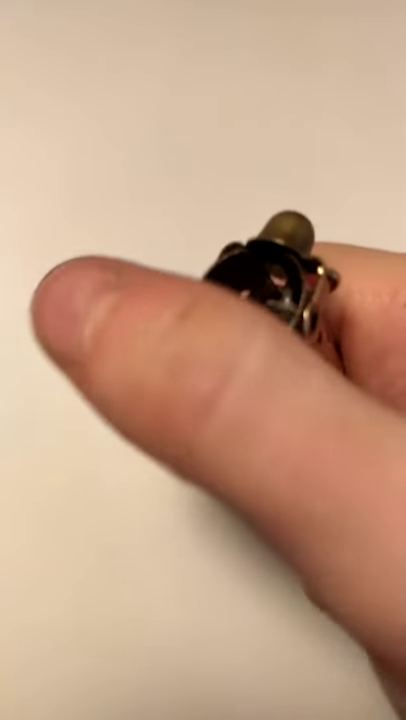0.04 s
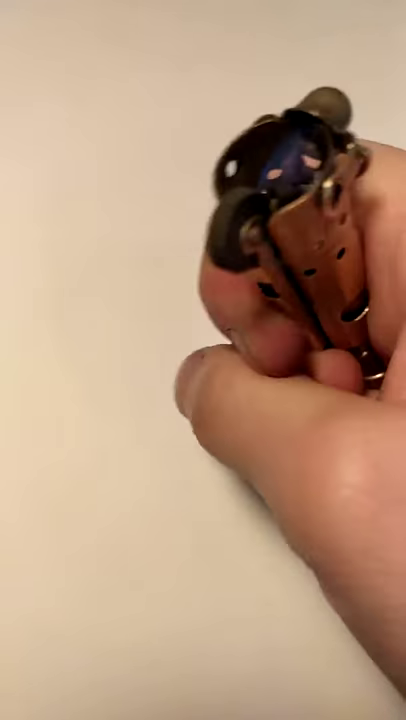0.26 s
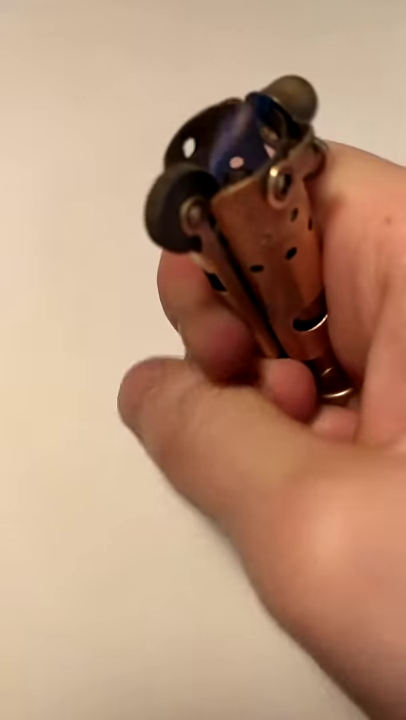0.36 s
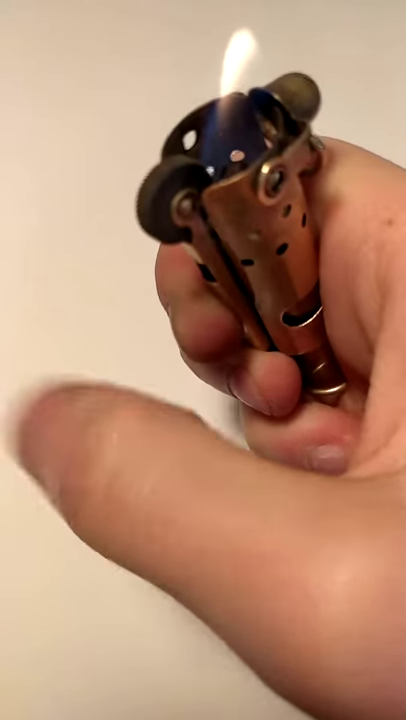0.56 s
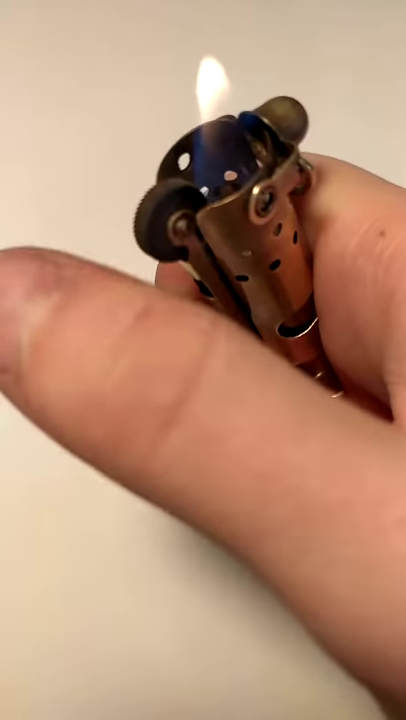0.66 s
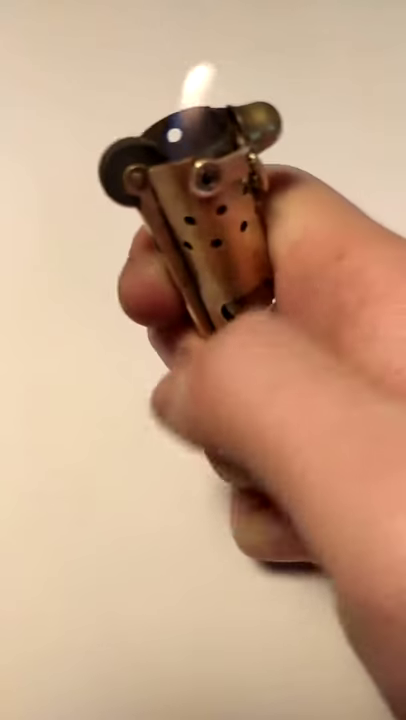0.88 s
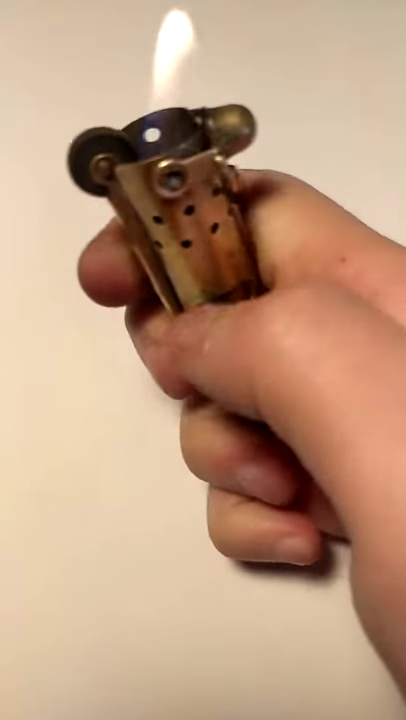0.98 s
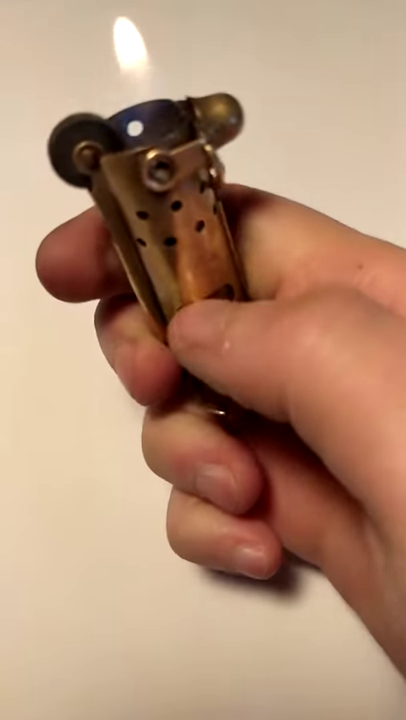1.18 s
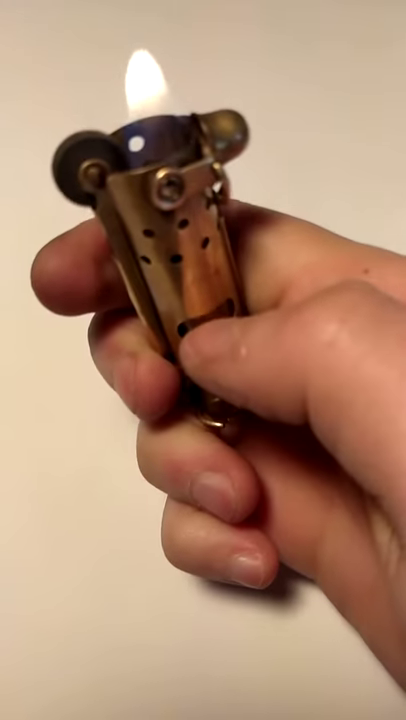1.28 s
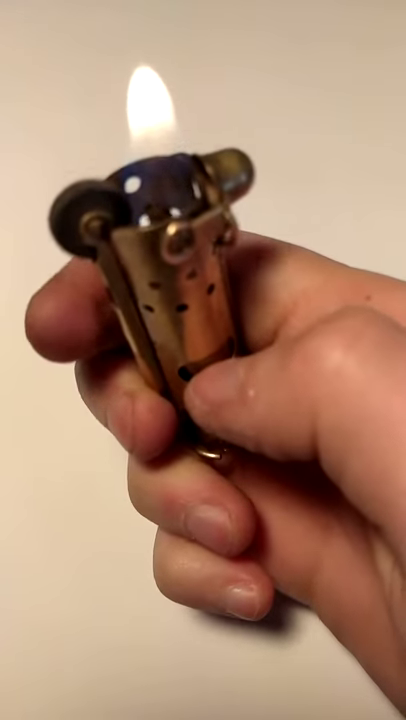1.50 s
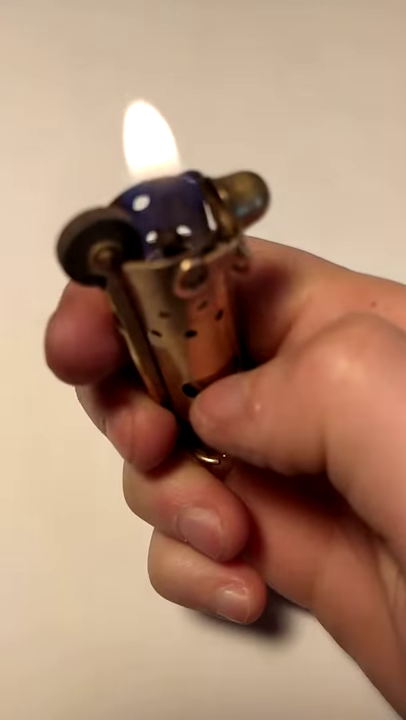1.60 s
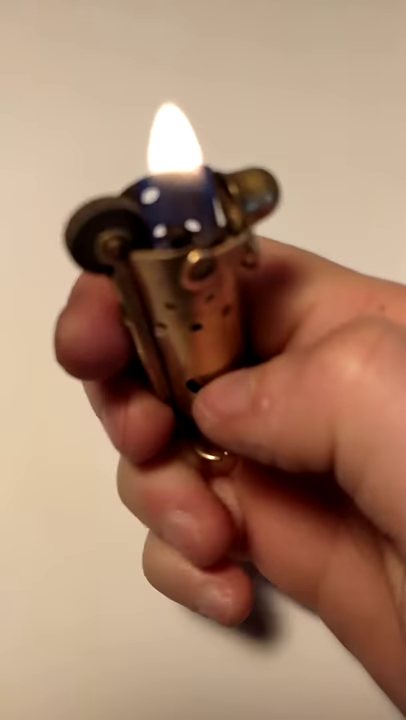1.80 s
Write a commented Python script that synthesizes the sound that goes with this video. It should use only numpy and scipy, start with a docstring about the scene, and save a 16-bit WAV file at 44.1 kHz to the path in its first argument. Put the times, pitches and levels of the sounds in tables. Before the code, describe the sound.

A brass lighter's flint wheel is struck close to the microphone: a faint thumb slide and soft tap, then at 0.23 seconds a very short, bright gritty rasp with hollow clack and low thud. Loose parts rattle and ring until about 0.3. Dull taps follow at 0.4 and 0.47, a nail tick at 0.83, then a tiny scrape and metallic ticks from 1.0 to 1.12, over quiet room hiss and low murmur.

```python
"""In a small quiet room, a thumb spins the flint wheel of a brass lighter close to the microphone.
The wheel bites, rasps and lets go: streams of chips and grit excite damped resonances of wheel and frame.
The hand thuds as decaying sines, the case rings in its modes, and loose parts rattle as short noise bursts.
Then the fingers shift their grip with small ticks and a scrape, over hiss, a faint whine and a low murmur."""
import sys
import numpy as np
from scipy import signal
from scipy.fft import rfft, irfft, next_fast_len
from scipy.io import wavfile
from scipy.ndimage import map_coordinates

SR = 44100
rng = np.random.default_rng(int(sys.argv[2]) if len(sys.argv) > 2 else 0)


def dump(signal):
    """Clip the signal to [-1, 1] and save it as 16-bit WAV at the path in sys.argv[1]."""
    limited = np.clip(np.atleast_2d(signal).T, -1, 1)
    pcm = np.round(limited * 32767).astype(np.int16)
    wavfile.write(sys.argv[1], SR, pcm)


N = 81585
T = np.arange(N) / SR  # time in seconds


def amp(db):
    """Decibels to amplitude: 20 dB is a factor of ten."""
    return 10 ** (np.asarray(db) / 20)


def unit(x):
    """Normalisation of the mean power: x scaled to rms 1."""
    return x / np.sqrt(np.mean(x ** 2) + 1e-20)


def along(points, hz):
    """Interpolation of (Hz, value) points on a logarithmic frequency axis."""
    f, value = np.transpose(points)
    return np.interp(np.log(hz + 1), np.log(f + 1), value)


def level(rows, outside=-120):
    """Envelope through (s, dB) points, linear in decibels; outside=None holds the end values."""
    s, db = np.transpose(rows)
    return amp(np.interp(T, s, db, outside, outside))


def pan(db):
    """Stereo placement by level difference: left minus right in dB."""
    return amp(np.array([[.5], [-.5]]) * db)


def filtered(x, response):
    """Linear filtering: the spectrum of x times a response of frequency."""
    size = next_fast_len(N + SR // 2)
    hz = np.fft.rfftfreq(size, 1 / SR)
    return irfft(rfft(x, size) * response(hz), size)[..., :N]


def coloured(x, colour):
    """Spectral shaping by (Hz, dB) points, at rms 1."""
    return unit(filtered(x, lambda hz: amp(along(colour, hz))))


def noise(colour):
    """Coloured noise, incoherent between the two channels."""
    return coloured(rng.standard_normal((2, N)), colour)


def diffuse(colour):
    """Diffuse field: noise from all around is coherent between the channels only at low frequencies."""
    # Likeness of left and right. Each row: frequency in Hz, correlation from 0 to 1.
    alike = [(30, .6), (150, .5), (350, .45), (900, 0), (15000, 0.0033)]

    def mid_and_side_gains(hz):
        angle = np.arccos(np.clip(along(alike, hz), -1, 1)) / 2
        return np.array([np.cos(angle), np.sin(angle)])

    mid, side = filtered(noise(colour), mid_and_side_gains)
    return unit(np.array([mid + side, mid - side]))


def blow(start, t60, attack=.0003):
    """Contact envelope: a quick rise, then exponential decay by 60 dB per t60 (all in seconds)."""
    t = np.maximum(T - start, 0)
    return (1 - np.exp(-t / attack)) * 1000 ** (-t / t60)


def clicks(rows, colour):
    """Impacts as short decaying noise bursts of one colour, from (s, dB, t60 s, pan dB) rows."""
    envelope = sum(amp(db) * pan(side) * blow(s, t60) for s, db, t60, side in rows)
    return noise(colour) * envelope


def room(x):
    """Reverberation: convolution with a noise tail whose decay time depends on frequency."""
    # Decay of the room. Each row: frequency in Hz, t60 in seconds.
    decay = [(100, .25), (500, .25), (2500, .33), (6000, .27), (10000, .22), (15000, .15)]
    hz, t, cells = signal.stft(rng.standard_normal((2, SR // 2)), SR, nperseg=256)
    fading = amp(-60 * t / along(decay, hz)[:, None])
    tail = signal.istft(cells * fading, SR, nperseg=256)[1]
    tail = tail * (1 - np.exp(-T[:tail.shape[1]] / .001))  # soft onset of the tail
    return signal.fftconvolve(x, tail / np.linalg.norm(tail[0]), axes=1)[:, :N]


def hiss():
    """Broadband room noise as a steady diffuse field."""
    # Spectrum of the hiss. Each row: frequency in Hz, relative level in dB.
    colour = [(12, -36), (20, -7), (37, -5.5), (70, -9.5), (116, -5), (203, -9), (261, -2.5), (375, -7.5),
              (539, -8.5), (754, -10.5), (819, -13), (891, -11), (1390, -13.5), (2060, -14), (2570, -16.5),
              (4890, -18.5), (15800, -29.5)]
    return amp(-68) * diffuse(colour) * pan(-2)


def whine():
    """Pure tone: a faint steady sine, equal in both channels."""
    return amp(-88) * np.sin(2 * np.pi * 2067 * T)


def murmur():
    """Air noise in a narrow low band, slowly modulated in level."""
    # Swell of the murmur. Each row: time in seconds, level in dB before the lift below.
    swell = [(0, -73), (.25, -78), (.55, -81), (.8, -73.5), (1.1, -72.5), (1.38, -67), (1.47, -79.5),
             (1.85, -79)]
    # Spectrum of the murmur. Each row: frequency in Hz, relative level in dB.
    colour = [(150, -48), (240, -11.5), (275, 1.5), (350, 2.5), (420, 0), (520, -10), (900, -31)]
    lift_db = 1.5
    return amp(lift_db) * level(swell, None) * diffuse(colour) * pan(-6.5)


def background():
    """Superposition of the steady hiss, the whine and the murmur of air."""
    return hiss() + murmur() + whine()


def slide():
    """Sliding friction: noise of the thumb on the wheel, fading out before the main stroke."""
    # Spectrum of the friction. Each row: frequency in Hz, relative level in dB.
    colour = [(300, 1.5), (900, 2.5), (1900, 8), (3000, -0.5), (4500, 7), (6800, -10), (9500, 0),
              (12000, -15), (15500, -28)]
    end_s, fade_s = .225, .025
    fade = np.clip((end_s - T) / fade_s, 0, 1)
    return amp(-65.5) * fade * noise(colour) * pan(-2.5)


def taps():
    """Soft impacts: dull taps of the fingers."""
    # The taps. Each row: start in seconds, level in dB, t60 in seconds, pan in dB.
    touches = [(.166, -53.5, .02, -3), (.3948, -55.5, 0.034, 2.5), (.4712, -54.5, .018, 5.5)]
    # Spectrum of the taps. Each row: frequency in Hz, relative level in dB.
    colour = [(200, 0), (800, -5.5), (2200, 3), (5000, -2.5), (9000, -2.5), (15000, -22)]
    return clicks(touches, colour)


def wheel(grit):
    """Stick of uneven teeth on flint: each tooth chips off a tiny noise burst, in a stream of grit."""
    teeth_per_s, jitter_teeth, scatter_db = 1700, .25, 4
    chip_s = .00038  # time constant of one chip's decay
    count = 6000
    draws = rng.standard_normal((count, 2))
    times = (np.arange(count) + jitter_teeth * draws[:, 0]) / teeth_per_s
    strengths = amp(scatter_db * draws[:, 1])
    teeth = np.bincount(np.abs(times * SR).astype(int), strengths, N)[:N]
    chips = unit(signal.lfilter([1], [1, -np.exp(-1 / (chip_s * SR))], teeth))
    return (chips + grit) * rng.choice([-1, 1], (2, N))  # random signs turn the envelope into noise


def bite():
    """Slow friction at first contact: the wheel grips the flint."""
    # Course of the bite. Each row: time in seconds, level in dB before the lift below.
    course = [(.217, -75), (.2205, -52), (.224, -43), (.229, -46), (.235, -41), (.239, -60)]
    # Spectrum of the bite. Each row: frequency in Hz, relative level in dB.
    colour = [(500, -9), (2500, -8.5), (4200, -2.5), (5200, 7.5), (6300, -7), (7400, -5), (9500, -4.5),
              (11500, -10), (15500, -37)]
    lift_db = 2
    return amp(lift_db) * coloured(wheel(grit=.96), colour) * level(course)


def frame(hz):
    """Resonance: the response of wheel and frame peaks at damped modes over a broad band."""
    # Modes. Each row: frequency in Hz, width between -6 dB points in Hz, relative level in dB.
    modes = [(1670, 300, -6), (2814, 1000, -1.5), (4190, 330, 1.5), (4850, 900, -2), (5484, 306, 1),
             (6600, 170, -6), (8446, 730, 6.5), (9386, 440, 4), (10300, 130, 0), (11043, 410, 3),
             (12350, 400, -12), (15330, 500, -5.5)]
    # Broad part of the rasp. Each row: frequency in Hz, relative level in dB before its power is halved.
    broad = [(300, -37.5), (600, -6), (1700, -10), (3000, -8), (5500, -6), (7300, -6), (10000, -2.5),
             (12500, -5.5), (15500, -10.5)]
    peaks = sum(amp(db) ** 2 / (1 + ((hz - f) / (width / 2)) ** 2) ** 2 for f, width, db in modes)
    power = amp(-1) ** 2 * peaks + amp(along(broad, hz)) ** 2 / 2
    return np.sqrt(power)


def rasp():
    """Forced vibration: chips and grit of the spinning wheel drive the resonant frame."""
    # Course of the rasp. Each row: time in seconds, level in dB before the stereo balance.
    course = [(.229, -70), (.2335, -45), (.2361, -38), (.2376, -25), (.2401, -18.5), (.2416, -26),
              (.2462, -29), (.250, -36), (.254, -52), (.258, -70)]
    # Stereo balance. Each row: frequency in Hz, left minus right in dB.
    balance = [(300, 3), (1200, 4), (2500, 4), (5000, 4.5), (7500, 4), (10500, -1.5), (14000, 6)]
    driven = unit(filtered(wheel(grit=1), frame)) * level(course)
    return filtered(driven, lambda hz: pan(along(balance, hz)))


def shudder():
    """Damped random vibration: the hand shudders with the stroke."""
    # Spectrum of the shudder. Each row: frequency in Hz, relative level in dB.
    colour = [(25, -21), (60, -4), (120, 4), (200, -11.5), (320, -6.5), (450, -5.5), (800, -36.5),
              (2000, -53.5)]
    return amp(-46) * blow(.23, t60=.22, attack=.0012) * diffuse(colour)


def knocks():
    """Heavily damped oscillators: thumb and hand knock on the lighter, without deep bass."""
    # The knocks. Each row: start in seconds, level in dB before the low cut, pitch in Hz,
    # t60 in seconds, pan in dB.
    rows = [(0.2355, -31, 363, 0.023, 2.5), (.2392, -27, 104, 0.053, 3.5), (.2445, -29.5, 290, 0.027, -1.5),
            (.2655, -43, 250.5, .035, -9.5), (0.2755, -43.5, 110.3, .045, -2.5),
            (.3090, -54, 140, 0.039, 2), (.471, -64, 150, .06, 1)]
    low_cut_hz, lag_s = 46.3, .00065
    thuds = 0
    for s, db, hz, t60, side in rows:
        sine = np.sin(2 * np.pi * hz * (T - s))
        thuds = thuds + amp(db) * pan(side) * blow(s, t60, attack=.0012) * sine
    delays = np.array([[.5], [-.5]]) * lag_s  # the left channel comes later by lag_s

    def delayed_low_cut(hz):
        return np.exp(-2j * np.pi * hz * delays) * hz ** 4 / (hz ** 4 + low_cut_hz ** 4)

    return filtered(thuds, delayed_low_cut)


def clack():
    """Sudden impact: a hollow narrow-band burst as the thumb snaps against the lighter."""
    # The clack. Each row: start in seconds, level in dB, t60 in seconds, pan in dB.
    release = [(.2365, -25.5, 0.012, 7)]
    # Spectrum of the clack. Each row: frequency in Hz, relative level in dB.
    colour = [(400, -22), (800, -9), (1200, 14.5), (1600, -10), (2100, -20), (5000, -25)]
    return clicks(release, colour)


def rattle():
    """Repeated impacts: the loose parts strike one another after the stroke."""
    # The impacts. Each row: start in seconds, level in dB, pan in dB.
    impacts = [(0.2441, -29, 14.5), (0.2656, -35, 4), (0.2721, -44, 10), (0.2763, -38.5, 8),
               (0.2948, -42.5, 6)]
    # Spectrum of the loose parts. Each row: frequency in Hz, relative level in dB.
    colour = [(290, -34), (500, -6.5), (771, -10.5), (878, -13.5), (2450, -8), (2750, -16), (3570, -5.5),
              (4560, -3), (5660, -6.5), (11000, -3), (15800, -18.5)]
    t60_s = .015
    return clicks([(s, db, t60_s, side) for s, db, side in impacts], colour)


def case(x):
    """Modal ringing: the brass case answers whatever shakes it with decaying sines."""
    # Modes of the case. Each row: frequency in Hz, relative level in dB, t60 in seconds.
    modes = [(2751, -14, .3), (3240, -12, .25), (4125, -5, .18), (4430, -5, .22), (4890, -8, .18),
             (5669, -12, .35), (6627, -5, .25), (7058, -4, .17), (7407, -4, .18), (8188, -6, .2),
             (8762, -11, .18), (9338, -11, .2), (9875, -8, .16), (11080, -4, .14), (11636, -3, .15)]
    t = T[:SR // 2]
    phases = rng.uniform(0, 2 * np.pi, (len(modes), 2, 1))
    ring = 0
    for (hz, db, t60), phase in zip(modes, phases):
        ring = ring + amp(db - 60 * t / t60) * np.sin(2 * np.pi * hz * t + phase)
    return signal.fftconvolve(x, ring / np.linalg.norm(ring[0]), axes=1)[:, :N]


def strike():
    """Excitation and response: the metal sounds shake the case, and metal and thuds excite the room."""
    metal = bite() + rasp() + rattle()
    to_tails = metal * pan(-7)  # ring and room lean to the right
    metal_tails = amp(-18) * case(to_tails) + amp(-16) * room(to_tails)
    thud = knocks() + shudder() + clack()
    return metal + metal_tails + thud + amp(-22) * room(thud)


def nail():
    """Hard light impacts: crisp ticks of a fingernail."""
    # The nail ticks. Each row: start in seconds, level in dB, t60 in seconds, pan in dB.
    touches = [(.8308, -50.5, .011, 0), (1.0345, -59, 0.013, 3.5), (1.1158, -53, 0.016, -3)]
    # Spectrum of the nail. Each row: frequency in Hz, relative level in dB.
    colour = [(800, -14), (2500, 3), (5000, 3), (10000, 3.5), (15500, -18)]
    return clicks(touches, colour)


def scrape():
    """Rough friction: the lighter slips through the fingers, its noise modulated in random grains."""
    # Course of the scrape. Each row: time in seconds, level in dB before the pan.
    course = [(1.002, -62), (1.007, -60.5), (1.022, -63.5), (1.035, -59), (1.042, -67), (1.051, -65),
              (1.064, -82)]
    # Spectrum of the scrape. Each row: frequency in Hz, relative level in dB.
    colour = [(800, -16), (2400, -11), (3300, 0.5), (4200, -10), (5100, 4.5), (6300, -12.5), (8500, -1),
              (11000, -8), (15500, -15.5)]
    grains_per_s, grain_db = 700, 4
    grains = map_coordinates(rng.standard_normal(N), [T * grains_per_s])  # smooth random curve
    rough = amp(grain_db * grains) * rng.standard_normal((2, N))
    return coloured(rough, colour) * level(course) * pan(-.82)


def ticks():
    """Small metal impacts as the grip shifts."""
    # The ticks. Each row: start in seconds, level in dB, t60 in seconds, pan in dB.
    touches = [(1.0130, -45, 0.0094, -2), (1.0278, -66, .01, -9), (1.0505, -59, .012, 0),
               (1.0900, -41.5, 0.021, 0), (1.1160, -52, 0.01, -8), (1.1200, -60, .009, -2)]
    # Spectrum of the ticks. Each row: frequency in Hz, relative level in dB.
    colour = [(800, -19), (2000, -7), (3200, -8), (4900, 6), (6000, -2), (7200, 7.5), (9000, -1.5),
              (12000, -12), (15500, -26)]
    return clicks(touches, colour)


def handling():
    """Contact sounds of the fingers with their reverberation, and the dry slide of the thumb."""
    touches = taps() + nail() + scrape() + ticks()
    return slide() + touches + amp(-13) * room(touches)


def scene():
    """Superposition of the room, the handling and the strike."""
    return background() + handling() + strike()


def record(dry):
    """Band limitation: an ideal low-pass filter keeps only what lies below 15830 Hz."""
    return filtered(dry, lambda hz: hz < 15830)


dry = scene()
out = record(dry)
dump(out)
```